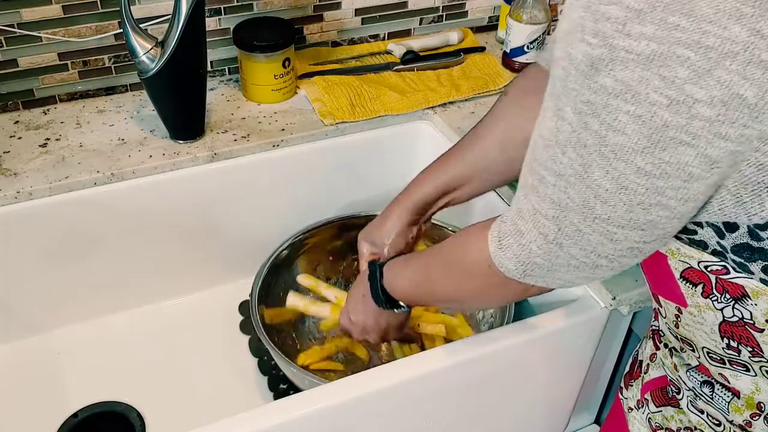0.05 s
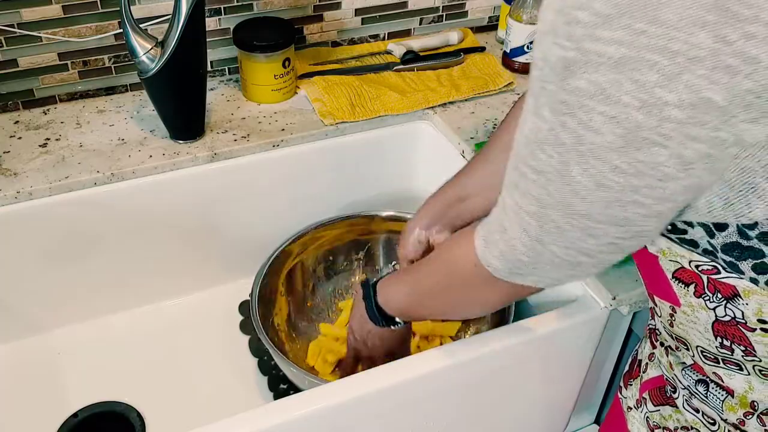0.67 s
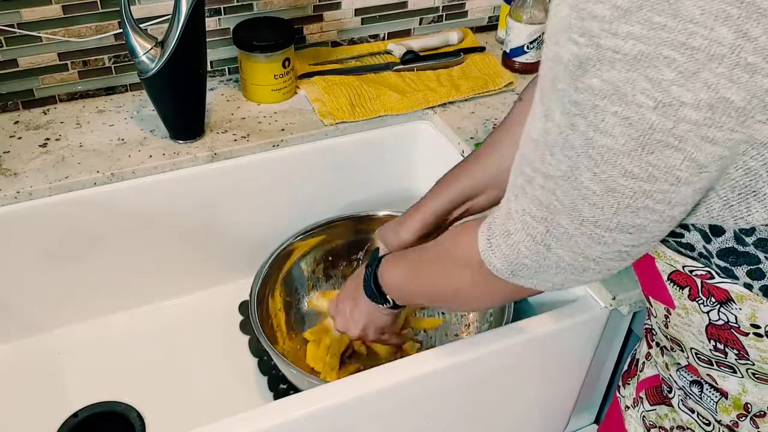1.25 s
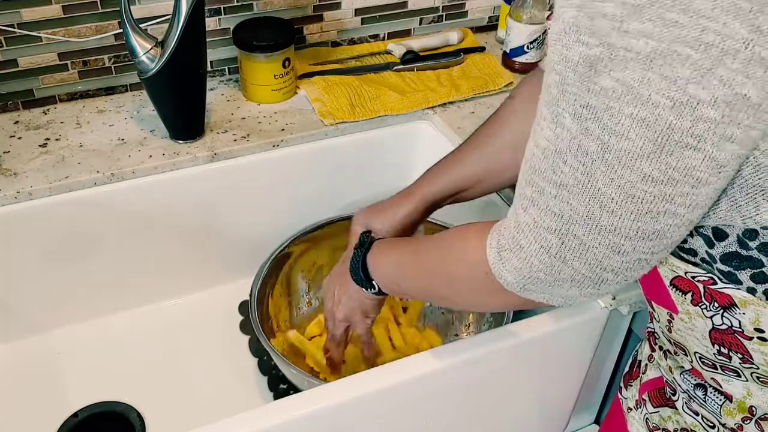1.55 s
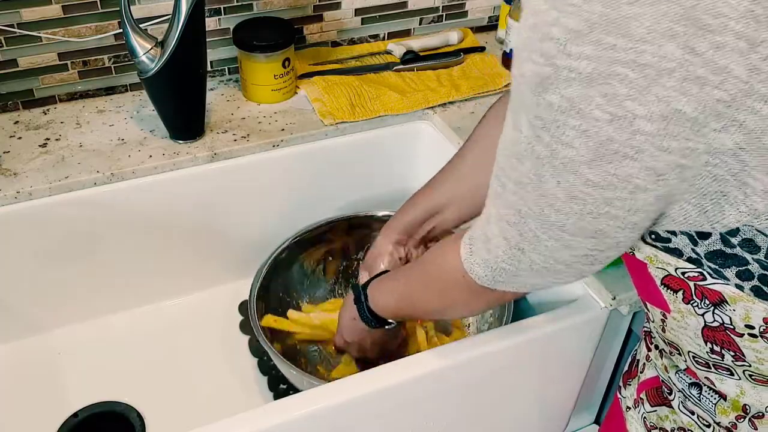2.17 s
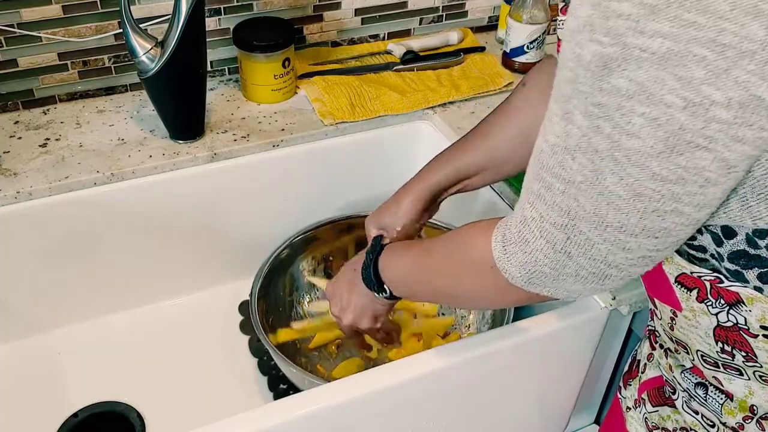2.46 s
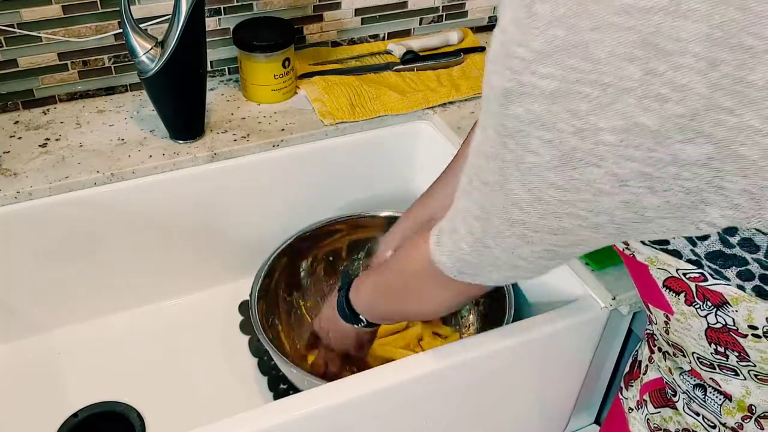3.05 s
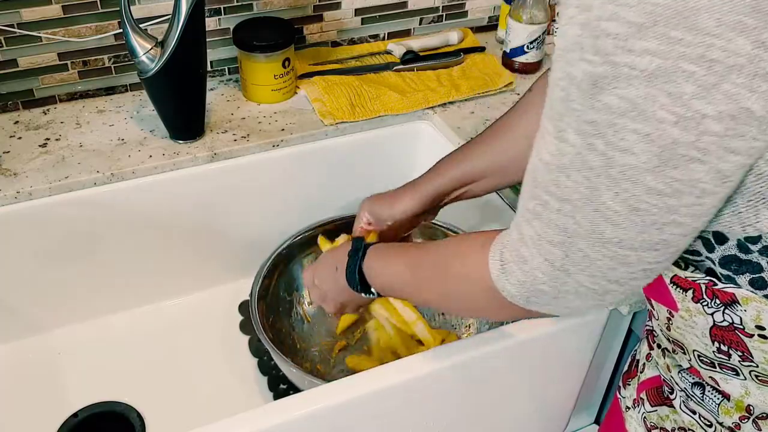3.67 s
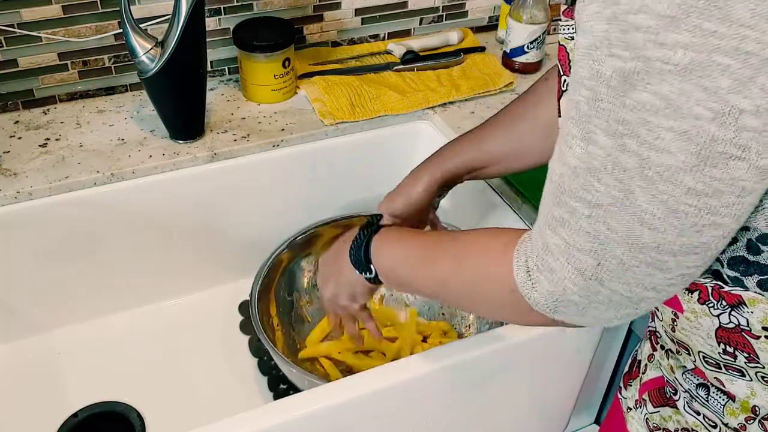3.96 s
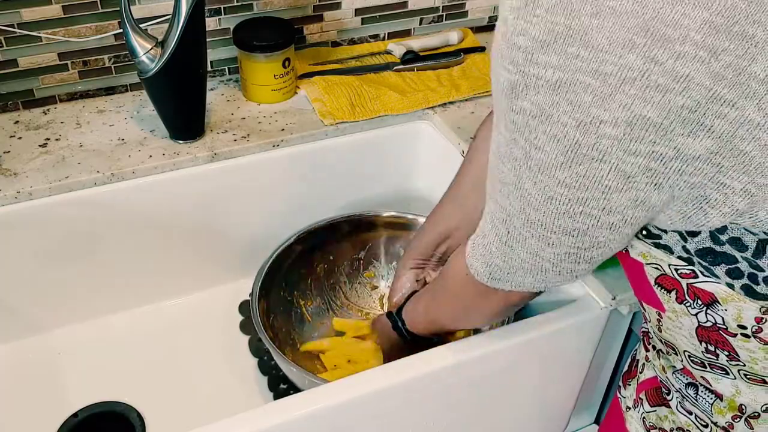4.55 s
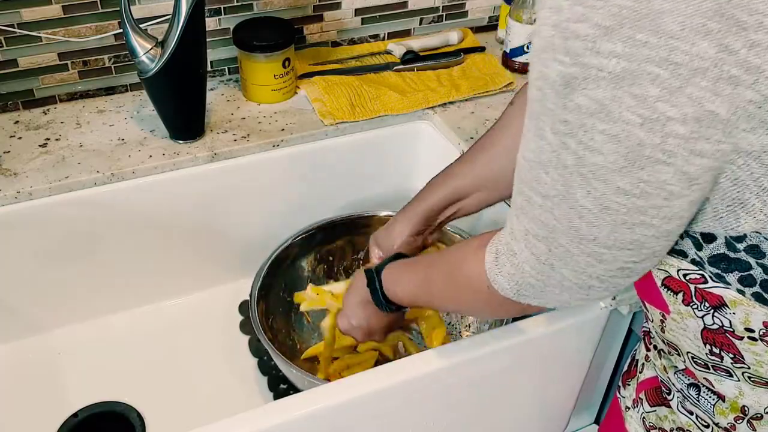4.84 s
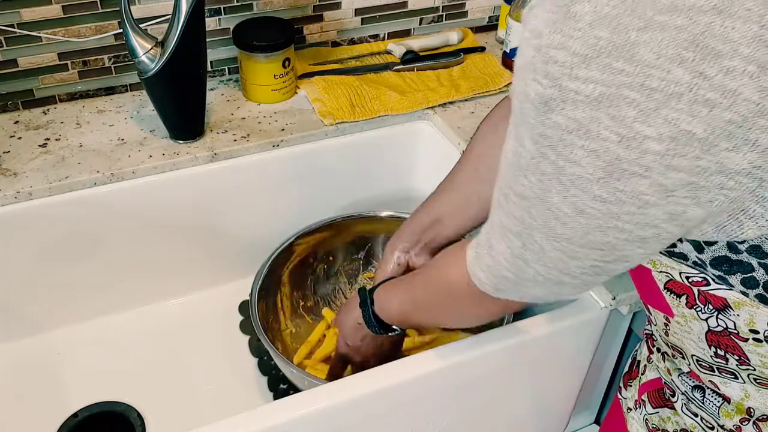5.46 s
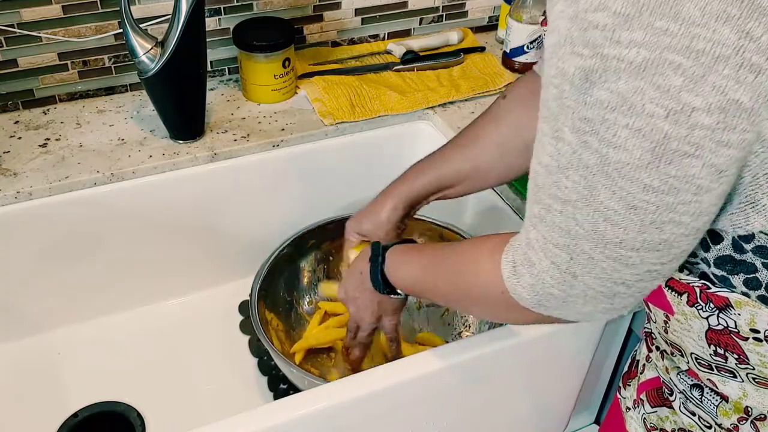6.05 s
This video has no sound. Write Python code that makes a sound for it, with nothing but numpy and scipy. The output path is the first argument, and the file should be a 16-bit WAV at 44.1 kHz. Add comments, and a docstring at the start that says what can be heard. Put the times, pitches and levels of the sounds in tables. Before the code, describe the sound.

Greasy cut potatoes squish and crackle under mixing hands, knocking and rubbing against a metal bowl in a kitchen sink.

```python
"""In a kitchen sink, hands toss raw, buttered potato sticks in a steel bowl.
Falling fries knock the bowl and make it ring; dragged ones rub a hollow note out of it.
The hands dig in, squeeze and let go, so the greasy film smacks, crackles and hisses.
Now and then the bowl bumps the sink or rocks on its base.
Bowl, sink and kitchen echo it all over a faint room hum."""
import sys
import numpy as np
from scipy import signal
from scipy.fft import rfft, irfft
from scipy.io import wavfile
from scipy.ndimage import uniform_filter1d

SR = 44100
rng = np.random.default_rng(int(sys.argv[2]) if len(sys.argv) > 2 else 0)


def master_out(mix):
    """Clip the mix to full scale and print it as 16-bit PCM to the path in sys.argv[1]."""
    frames = np.transpose(np.atleast_2d(mix))
    ceiling = np.clip(frames, -1, 1)
    pcm = np.round(ceiling * 32767).astype(np.int16)
    wavfile.write(sys.argv[1], SR, pcm)


N = 278271  # table levels are relative: each function adds its own gain

# fries and knuckles landing in the bowl: t/s, ring level/dB, slap level/dB, knock f/Hz
LANDINGS = [(0.118, -30, -74, 704), (0.283, -39, -53.5, 795), (0.418, -26.5, -44, 416),
            (0.449, -12.5, -28, 760), (0.465, -15, -37, 620), (0.499, -46, -36.5, 670),
            (0.513, -20, -35.5, 378), (0.58, -28, -43.5, 856), (0.659, -25.5, -34.5, 773),
            (1.236, -34.5, -42.5, 942), (1.479, -37, -56, 700), (1.545, -23.5, -39.5, 910),
            (1.6025, -37, -32, 790), (1.6075, -18.5, -23.5, 924), (1.62, -26, -29.5, 776),
            (1.956, -35.5, -41, 954), (2.307, -33.5, -50, 758), (2.457, -25, -36.5, 980),
            (2.611, -29.5, -40.5, 1120), (2.6765, -21, -29.5, 695), (2.685, -20, -54, 700),
            (2.708, -23.5, -31.5, 792), (2.886, -55, -54, 790), (2.972, -35.5, -37.5, 786),
            (3.004, -39.5, -37, 447), (3.706, -41.5, -58, 687), (3.755, -60, -41.5, 1100),
            (3.78, -67.5, -41, 1060), (3.805, -67, -44, 1080), (3.883, -25, -38.5, 660),
            (3.899, -28, -41, 620), (3.955, -29.5, -38, 820), (4.051, -37.5, -42, 890),
            (4.141, -62, -43.5, 887), (4.258, -55, -55.5, 786), (4.533, -41.5, -38, 826),
            (5.077, -15, -36, 837), (5.396, -50, -37.5, 444), (6.022, -67, -56.5, 1060),
            (6.107, -39, -29, 800), (6.119, -24.5, -33.5, 660), (6.171, -20, -32, 770),
            (6.181, -27, -48, 706), (6.212, -21, -38, 600)]


def knocks():
    """Each landing gives a short pitched knock, a slap and a soft thud, and makes the bowl ring."""
    out, t = np.zeros(N), np.arange(SR // 3) / SR
    for s, ring_db, slap_db, hz in LANDINGS:
        softness_db = max(-35.5 - slap_db, 0)  # soft landings lose their knock
        knock = amp(slap_db + 5 - 1.8 * softness_db) * blip(t, hz, peak_s=0.0022)
        slap = amp(slap_db + 19.5) * colour(patter(t, follow=0.57, fade_s=0.014), SLAP_SPECTRUM)
        ring = amp(ring_db - 16.5) * bowl_ring(t)
        ring += amp(slap_db + 3) * bowl_ring(t, above_hz=600)  # a slap also rings the higher tones
        add(out, s, knock + (ring + slap + thud(t, ring_db - 24)) * landing(t, slap_db))
    return out


def landing(t, slap_db):
    """Loudness of a landing: gentle ones swell slowly, and the settling heap muffles them all."""
    rise_s = 0.00084 * amp(-.85 * max(slap_db + 22, -24))
    free_s, damping_db_per_s = 0.0488, 211
    return (1 - np.exp(-t / rise_s)) * amp(-damping_db_per_s * np.maximum(t - free_s, 0))


# the loaded bowl's weaker tones: f/Hz, level/dB, time to fade by 60 dB/s
BOWL_TONES = [(242, -28, 0.24), (305, -17.5, 0.32), (372, -22.5, 0.1), (411, -21.5, 0.071),
              (470, -15.5, 0.22), (561, -15.5, 0.4), (618, -14, 0.073), (733, -23, 0.12), (814, -23.5, 0.3),
              (863, -25, 0.27), (921, -20, 0.14), (1035, -30.5, 0.19), (1075, -29.5, 0.3),
              (1170, -31.5, 0.14), (1750, -33.5, 0.19), (1920, -39.5, 0.13)]


def bowl_ring(t, above_hz=0):
    """The steel rings: the spot that is hit sets each tone's strength, and the load shifts its pitch."""
    detune, spot = rng.standard_normal((2, len(BOWL_TONES)))
    tuning = 1 + 0.0018 * detune + 0.0074 * rng.standard_normal()
    return sum(amp(db + spot_db - 60 * t / fade_s) * np.sin(2 * np.pi * hz * shift * t)
               for (hz, db, fade_s), shift, spot_db in zip(BOWL_TONES, tuning, 4 * spot)
               if hz > above_hz)


def hollow_note():
    """Drags and knocks feed the bowl's main tone, which rings on after them."""
    note_hz, fade_s = 490, 0.15  # fades by 60 dB in this time
    energy, t = np.zeros(N), np.arange(SR // 3) / SR
    for s, length, db, _ in DRAGS:
        add(energy, s, (amp(db - 0.95) * drag(np.arange(0, length, 1 / SR), length)) ** 2)
    keep = amp(-120 / (fade_s * SR))  # share of the energy left after one sample
    energy = signal.lfilter([1 - keep], [1, -keep], energy)
    for s, ring_db, slap_db, _ in LANDINGS:
        add(energy, s, (amp(ring_db - 4 - 60 * t / fade_s) * landing(t, slap_db)) ** 2)
    hz = note_hz + 6.005 * wander(N, size=1500)  # the load shifts
    waver_db = 2.5 * wander(N, size=500)
    chatter_db = 1.5 * wander(N, size=90)  # fries chatter against the steel
    return np.sqrt(energy) * amp(waver_db + chatter_db) * np.sin(2 * np.pi * np.cumsum(hz) / SR)


# the heap dragged along the steel: t/s, length/s, hollow note level/dB, scuff level/dB
DRAGS = [(0.121, 0.075, -44.5, -74), (0.507, 0.11, -37, -51.5), (0.612, 0.079, -43.5, -56),
         (1.25, 0.052, -45.5, -54), (1.291, 0.099, -70, -64.5), (1.492, 0.098, -35, -54.5),
         (1.634, 0.075, -37, -48), (2.15, 0.073, -69, -61), (2.287, 0.075, -51, -70.5),
         (2.459, 0.055, -36, -49), (2.59, 0.19, -38, -52.5), (3.25, 0.109, -68.5, -64.5),
         (3.722, 0.27, -55, -60), (3.876, 0.152, -42, -46), (4.579, 0.088, -61.5, -62),
         (4.988, 0.045, -42.5, -72), (5.029, 0.14, -42, -49), (5.084, .055, -36, -53),
         (5.159, 0.143, -60.5, -60), (5.278, 0.09, -47.5, -60.5), (5.335, 0.122, -48, -55.5),
         (5.537, 0.11, -44, -58), (5.627, 0.064, -38.5, -53), (6.177, 0.0685, -35.5, -50),
         (6.26, 0.043, -50, -66)]
# the sound of potato hitting or scuffing steel: f/Hz, level/dB
SLAP_SPECTRUM = [(150, -41), (400, -12), (620, -7), (800, 6), (950, -5), (1100, -7.5), (1350, -17),
                 (2100, -19.5), (3500, -34), (7000, -66.5)]


def rubs():
    """Potato sticks and slips on the steel, stirring its weaker tones while the heap shuffles."""
    out = np.zeros(N)
    for s, length, _, scuff_db in DRAGS:
        t = np.arange(0, length, 1 / SR)
        ring = bowl_ring(np.arange(SR // 4) / SR)
        slips = pops(len(t) + len(ring), per_s=900, spread_db=1)
        stir = amp(-1.5) * evened(signal.fftconvolve(slips, ring, "valid")[:len(t)])
        scuff = amp(-9.5) * evened(colour(slips, SLAP_SPECTRUM)[-len(t):])
        shuffle = amp(-14.5) * evened(colour(slips, THUD_SPECTRUM)[-len(t):])
        add(out, s, amp(scuff_db) * (stir + scuff + shuffle) * drag(t, length))
    return out


def drag(t, length):
    """Loudness of a drag: it starts softly and eases off."""
    return amp(-4.5 * t / length) * signal.windows.tukey(len(t), .35)


# the dull sound of the potato heap: f/Hz, level/dB
THUD_SPECTRUM = [(60, -18), (140, -19.5), (220, -13.5), (320, 4), (430, 4), (600, -14), (900, -21.5),
                 (2000, -60), (5000, -95)]


def thud(t, db):
    """A dull blow travels through the heap."""
    return amp(db + 26) * colour(patter(t, follow=0.6, fade_s=0.031), THUD_SPECTRUM)


def patter(t, follow, fade_s):
    """One firm contact, then the rest of the handful settling."""
    push = follow * rng.standard_normal(len(t)) * np.exp(-t / fade_s) / np.sqrt(fade_s * SR / 2)
    push[0] += 1
    return push


# wet surfaces meeting or pulling apart:
# t/s, hiss level/dB, squelch level/dB, air pocket f/Hz, gap to the steel f/Hz, burst length/s
WET_SMACKS = [(0.127, -51, -78, 8000, 5060, 0.0044), (0.222, -43, -72, 7100, 6000, .004),
              (0.287, -63, -68, 7500, 4800, .009), (0.461, -38, -52, 6800, 4920, 0.0074),
              (0.578, -43, -59.5, 7000, 4800, 0.0055), (0.66, -30.5, -54.5, 7450, 4840, 0.0068),
              (0.793, -34, -81, 7200, 4400, .012), (0.976, -39.5, -51, 6600, 3850, 0.0058),
              (1.114, -54, -81, 8582, 5980, .005), (1.236, -57, -68, 7500, 5060, 0.015),
              (1.337, -53, -71, 9500, 6500, 0.0055), (1.546, -22, -41, 6270, 4720, .005),
              (1.604, -34.5, -44, 6900, 5000, 0.0063), (1.809, -36.5, -72, 7160, 5100, 0.0065),
              (1.831, -31, -70, 7000, 4670, .008), (1.846, -24.5, -71, 7000, 4550, 0.013),
              (2.025, -36, -46.5, 7200, 4400, .005), (2.197, -44.5, -69.5, 7020, 6020, .005),
              (2.343, -46.5, -72.5, 7800, 7000, .004), (2.456, -32, -48, 9000, 6060, 0.0058),
              (2.467, -34.5, -52, 11000, 7430, 0.0066), (2.611, -53, -59, 6500, 4800, 0.0045),
              (2.707, -31.5, -47.5, 6950, 5300, 0.0038), (2.897, -49.5, -69, 7200, 4800, 0.0034),
              (2.93, -33.5, -64, 7040, 4770, .006), (2.969, -20.5, -57, 6860, 4640, 0.0048),
              (3.082, -27.5, -54, 6860, 4500, 0.007), (3.15, -30, -50.5, 7000, 4200, .007),
              (3.207, -41, -43, 6800, 2860, 0.0056), (3.355, -52, -72, 8500, 4690, 0.015),
              (3.587, -57, -82, 9500, 6980, .004), (3.876, -47, -54.5, 7000, 4300, 0.0094),
              (3.9683, -12, -37.5, 6900, 4110, 0.0054), (4.052, -45, -53, 8500, 2820, 0.0038),
              (4.091, -21.5, -73, 6550, 4000, 0.0019), (4.116, -34, -71, 6900, 3830, .003),
              (4.2345, -42.5, -70, 5230, 4560, .004), (4.53, -23.5, -38, 6860, 4380, 0.0081),
              (5.078, -33, -46.5, 4760, 4710, 0.013), (5.36, -45, -56.5, 6800, 3400, 0.0085),
              (5.395, -34, -58, 7450, 5000, 0.0066), (5.517, -25.5, -62, 6900, 4470, 0.0089),
              (5.614, -33.5, -41, 6500, 3870, 0.0085), (5.656, -33, -43.5, 6500, 4000, 0.0072),
              (5.727, -47, -60, 7050, 4202, .01), (6.107, -24.5, -52.5, 6840, 4600, 0.0067),
              (6.285, -47, -76, 7000, 4420, 0.009)]


def smacks():
    """Loud smacks under the hands, and faint stray ones at random as fries come unstuck."""
    out, strays_per_s = np.zeros(N), 3
    chance = rng.random((round(strays_per_s * N / SR), 3))
    strays = [(when * N / SR, -64.5 + 9 * size, -78, 6000 + 4000 * pitch, 5500, .002)
              for when, size, pitch in chance]  # same columns as the table
    for s, *row in WET_SMACKS + strays:
        lead_s, sound = smack(*row)
        add(out, s - lead_s, sound)
    return out


def smack(hiss_db, squelch_db, pocket_hz, gap_hz, burst_s):
    """A rustle, then a burst that rings trapped air. Returns the time to the burst, and the sound."""
    t = np.arange(-SR // 25, SR // 6) / SR
    after = np.maximum(t, 0)
    touch = 0.18 * np.exp(-abs(t) / (2.1 * burst_s))
    rise = 1 - np.exp(-after / 0.00087)
    fall = 0.89 * np.exp(-after / burst_s) + 0.26 * amp(-60 * after / 0.11)
    burst = pops(len(t), per_s=6500, spread_db=1.5) * (touch + rise * fall)
    pocket = resonate(amp(5.5) * resonate(burst, pocket_hz, width_hz=1400), pocket_hz, width_hz=3600)
    gap = resonate(amp(8) * resonate(burst, gap_hz, width_hz=550), gap_hz, width_hz=1200)
    hiss = colour(burst, CRACKLE_SPECTRUM) + pocket + gap
    squelch = colour(burst, SQUELCH_SPECTRUM)
    return -t[0], amp(hiss_db - 8) * hiss + amp(squelch_db + 6.5) * squelch


# the fine, bright crackle of butter: f/Hz, level/dB
CRACKLE_SPECTRUM = [(1000, -49.5), (3000, -28.5), (3700, -21), (4400, -12), (5500, -8), (6400, -1),
                    (7200, 2.5), (7900, -3.5), (8600, -12), (10000, -22.5), (11500, -25.5), (12400, -44.5),
                    (15500, -60)]
# the lower squelch of larger air pockets: f/Hz, level/dB
SQUELCH_SPECTRUM = [(100, -11), (250, 4), (500, 7), (780, -0.5), (1120, 6.5), (1500, 2), (1950, 5),
                    (2600, 4), (3800, 6), (5500, 8.5), (8000, -2), (11000, -10), (12500, -16.5),
                    (15500, -48)]
# hands grabbing fries: start t/s, dig-in length/s, t/s when the swelling squelch would reach full level
# (may lie outside the grab), let-go t/s, crackle level/dB, squelch level/dB
HANDFULS = [(0.451, 0.032, 0.44, 0.54, -52.5, -66), (0.655, 0.05, 0.91, 0.86, -49.5, -51.5),
            (0.86, 0.012, 0.86, 0.94, -49.5, -52), (1.765, 0.062, 1.94, 2.062, -41, -48),
            (2.13, 0.02, 1.7, 2.26, -64.5, -73.5), (2.93, 0.036, 3.42, 3.223, -45.5, -35),
            (3.11, 0.042, 3.14, 3.164, -43, -44.5), (3.22, 0.016, 3, 3.275, -54, -58.5),
            (3.868, 0.012, 3.97, 3.993, -54, -46), (4.236, 0.087, 4.56, 4.553, -46.5, -43),
            (4.32, 0.024, 4.35, 4.38, -56, -56.5), (5.31, 0.092, 5.59, 5.44, -49, -55),
            (5.603, 0.006, 5.75, 5.672, -41.5, -43), (6.1, 0.033, 6.1, 6.16, -57.5, -70)]


def squeezes():
    """Sliding fries crackle; closing hands burst larger pockets, which squelch. Letting go ends both."""
    out = np.zeros(N)
    dig_from_db, swell_db_per_s, release_db_per_s = -17, 107, 310
    for start, dig_s, full_at, let_go, crackle_db, squelch_db in HANDFULS:
        t = np.arange(start, let_go + .2, 1 / SR)
        dig_db = dig_from_db * np.maximum(1 - (t - start) / dig_s, 0)
        contact = amp(dig_db - release_db_per_s * np.maximum(t - let_go, 0))
        swell_db = -swell_db_per_s * np.maximum(full_at - t, 0)
        jitter = rng.standard_normal((2, len(t)))  # the grip catches and slips many times a second
        grip, squeeze = evened(uniform_filter1d(uniform_filter1d(jitter, size=500), size=300))
        slide = contact * amp(crackle_db + 2 * grip)
        press = contact * amp(squelch_db + swell_db + 2.8 * squeeze)
        crackle = amp(1) * colour(slide * pops(len(t), per_s=800, spread_db=2.5), CRACKLE_SPECTRUM)
        squelch = colour(press * pops(len(t), per_s=420, spread_db=2), SQUELCH_SPECTRUM)
        froth = amp(-13.5) * bubbles(slide, per_s=230, cycles=22, low_hz=5380, high_hz=9900)
        froth += amp(-14.5) * bubbles(press, per_s=240, cycles=5, low_hz=663.6, high_hz=3040)
        spit = amp(-15) * bubbles(press, per_s=125, cycles=5, low_hz=8000, high_hz=11740)
        add(out, start, crackle + squelch + froth + spit)
    return out


def bubbles(push, per_s, cycles, low_hz, high_hz, count=10):
    """Air bubbles in the butter burst as loudly as they are pushed; each pings at a rising pitch."""
    out = np.zeros(len(push))
    for hz in np.geomspace(low_hz, high_hz, count) * rng.uniform(1.0, 1.04, count):
        age = np.arange(int(4 * cycles * SR / hz)) * hz / SR / cycles
        tone = np.sin(2 * np.pi * cycles * (age + 0.016 * age ** 2))
        ping = tone * np.exp(-age) * (1 - np.exp(-12 * age))
        sizes = amp(1.9 * np.minimum(rng.exponential(1, len(push)), 3))
        bursts = sizes * (rng.random(len(push)) < per_s / count / SR)
        out += signal.oaconvolve(push * bursts, ping / np.linalg.norm(ping))[:len(push)]
    return out * np.sqrt(SR / per_s / 2)


# fingers and fries sliding down the greasy wall: t/s, length/s, low edge of the hiss f/Hz, level/dB
WALL_SLIDES = [(0.656, 0.05, 4750, -45), (0.776, 0.13, 4100, -49.5), (1.829, 0.11, 4110, -40.5),
               (2.962, 0.1, 4500, -43), (3.086, 0.13, 4030, -49.5), (4.08, 0.057, 3990, -46),
               (4.231, 0.1, 4584, -43.5), (4.325, 0.12, 3940, -44.5), (5.068, 0.078, 4740, -44.5),
               (5.501, 0.12, 4470, -45.5), (6.108, 0.079, 4430, -44.5), (6.207, 0.042, 4400, -45)]


def scrapes():
    """A wet hiss rings the gap under a finger; it sinks and fades as the finger slows."""
    out, sag_hz_per_s, fade_db = np.zeros(N), 1200, -10
    for s, length, edge_hz, db in WALL_SLIDES:
        t = np.arange(0, length, 1 / SR)
        slips = pops(len(t), per_s=900, spread_db=2.5)
        hiss = signal.sosfilt(signal.butter(6, [edge_hz, 7800], "band", fs=SR, output="sos"), slips)
        gap = resonate(hiss, 1.003 * edge_hz - sag_hz_per_s * t, width_hz=610)
        catch_db = 3 * wander(len(t), size=300)  # the finger catches and slips
        loudness = amp(db + fade_db * t / length + catch_db) * signal.windows.tukey(len(t), .12)
        add(out, s, loudness * evened(hiss + amp(3) * gap))
    return out


# the bowl shoved against the sink: t/s, boom level/dB, wall level/dB, thud level/dB, thud f/Hz
SINK_BUMPS = [(0.287, -64.5, -56.5, -44, 379), (0.464, -56.5, -40, -35, 320), (0.657, -64.5, -45, -39, 420),
              (1.55, -60, -45.5, -34, 295), (1.611, -59, -42.5, -56, 395), (1.942, -63, -75, -62, 323),
              (2.46, -75, -52.5, -39, 285), (2.613, -65, -65, -40, 301), (2.707, -57.5, -60, -32, 298),
              (2.964, -67, -47, -42, 401), (3.001, -75, -55, -40.5, 350), (3.13, -57.5, -53.5, -49.5, 299),
              (3.709, -80.5, -71, -45.5, 348), (3.955, -58.5, -42.5, -35.5, 350),
              (4.086, -64, -44, -39, 345), (4.359, -63, -57.5, -55, 306), (4.559, -67, -68, -62, 296),
              (5.081, -60.5, -66, -38, 345), (5.269, -60.5, -58.5, -56, 303), (5.36, -60, -50, -48, 372),
              (5.389, -51, -45.5, -36.5, 401), (5.51, -65.5, -58, -51.5, 320),
              (6.094, -63, -68.5, -35.5, 446), (6.206, -56, -53, -32.5, 313)]


def bumps():
    """A shove thuds through the heap; the sink gives a deep boom and its wall rings faintly."""
    out, t = np.zeros(N), np.arange(SR // 2) / SR
    boom = dying_tone(t, hz=80, fade_s=0.075) - 0.69 * dying_tone(t, hz=60, fade_s=0.054)
    wall = dying_tone(t, hz=219, fade_s=0.046) + 0.5 * dying_tone(t, hz=172, fade_s=0.039)
    cushion = 1 - np.exp(-t / 0.0045)
    for s, boom_db, wall_db, thud_db, hz in SINK_BUMPS:
        heap = amp(thud_db - 6) * blip(t, hz, peak_s=0.0099) + thud(t, thud_db - 3.5) * cushion
        add(out, s, amp(boom_db + 5.5) * boom + amp(wall_db - 1) * wall * cushion + heap)
    return out


# the bowl rocking back onto its base: t/s, level/dB
BOWL_ROCKS = [(2.305, -44.5), (3.035, -53.5), (3.71, -45), (4.09, -48)]


def rocks():
    """Set down on its base, the bowl hums one low, lingering tone."""
    out, t = np.zeros(N), np.arange(SR // 2) / SR
    hz, rise_s, fade_s = 344, 0.0095, 0.39
    for s, db in BOWL_ROCKS:
        add(out, s, amp(db - 60 * t / fade_s) * (1 - np.exp(-t / rise_s)) * np.sin(2 * np.pi * hz * t))
    return out


# tones of the thin steel wall: f/Hz, width/Hz, level/dB
WALL_TONES = [(780, 26, 10), (921, 32, 8.5), (1084, 32, 6.5), (1940, 31, 8.5), (2674, 24, -4.5),
              (3960, 67, -2.5), (4500, 43, -1), (5016, 120, -0.5), (6100, 150, -3), (6570, 50, -6.5),
              (7000, 53, -5), (7530, 98.7, -1), (7963, 46, -4)]


def steel(wet):
    """The thin wall under the fries rings along with the crackle."""
    return amp(-3) * sum(amp(db) * signal.lfilter(*signal.iirpeak(hz, hz / width, fs=SR), wet)
                         for hz, width, db in WALL_TONES)


# the sound of the butter film left alone: f/Hz, level/dB
FIZZ_SPECTRUM = [(1000, -30), (3500, -19.5), (5200, -10), (6400, 0), (7600, 0), (9000, -5.5),
                 (11500, -15.5), (13000, -30)]
# how loudly it fizzes over time: t/s, level/dB
FIZZ_LEVELS = [(0, -69.5), (0.3, -67), (1.1, -70.5), (2.1, -67), (2.5, -64), (2.85, -70), (3.6, -72.5),
               (4.7, -70.5), (5.9, -69), (6.3, -65.5)]


def fizz():
    """The butter coating keeps ticking faintly, in little clumps."""
    level_db = np.interp(np.arange(N) / SR, *np.transpose(FIZZ_LEVELS)) + 1.9 * wander(N, size=900)
    return colour(amp(level_db) * pops(N, per_s=60, spread_db=3.5), FIZZ_SPECTRUM)


def wet_side():
    """All the wet sounds from one side of the heap, with the steel under them."""
    top_hz = 12700  # the wet sounds' highest treble is rolled off
    wet = smacks() + squeezes() + scrapes() + fizz()
    return signal.sosfilt(signal.butter(5, top_hz, fs=SR, output="sos"), wet + steel(wet))


def bowl_echoes(x):
    """Quick echoes off bowl and sink; the moving hands keep fading one pattern into the next."""
    hop = round(0.16 * SR)
    x, out = np.pad(x, (hop, 2 * hop)), np.zeros((2, N + hop))
    for at in range(0, N + hop, hop):
        piece = x[at:at + 2 * hop] * signal.windows.cosine(2 * hop)
        pair = echoes(piece, life=0.18, delay_s=.0003, low_hz=610, size=4096)
        for channel, sound in zip(out, pair):
            add(channel, at / SR, sound)
    return out[:, hop:]


# how long echoes last, before scaling by life: f/Hz, time to fade by 60 dB/s
ECHO_TIMES = [(150, 0.083), (500, 0.28), (1400, 0.17), (4000, 0.23), (10000, 0.16)]


def echoes(x, life, delay_s, low_hz, size=22050):
    """Many reflections blur into a tail in which each pitch dies at its own rate."""
    hz, t, bands = signal.stft(rng.standard_normal((2, size)), SR, nperseg=256)
    fade = amp(-60 * t / (life * read(ECHO_TIMES, hz))[:, None])
    tail = signal.istft(bands * fade, SR, nperseg=256)[1]
    bass_cut = signal.butter(2, low_hz, "high", fs=SR, output="sos")
    tail = signal.sosfilt(bass_cut, tail / np.linalg.norm(tail[0]))
    tail = np.pad(spread(*tail), ((0, 0), (round(delay_s * SR), 0)))
    return signal.fftconvolve(x[None], tail, axes=1)[:, :N]


# the kitchen's background noise: f/Hz, level/dB
HUM_SPECTRUM = [(20, -19), (50, -12), (85, -6.5), (125, -9.5), (180, -11), (220, -5.5), (280, -11),
                (400, -14), (490, -11.5), (620, -23), (1300, -31.5), (2000, -25.5), (3000, -27),
                (6800, -23), (10000, -27.5), (13000, -35), (15500, -37.5)]


def hum():
    """Steady room noise, nearly the same on both sides in the bass."""
    mid, side = (colour(rng.standard_normal(N), HUM_SPECTRUM, size=8192) for _ in range(2))
    return amp(-70) * spread(mid, side)


# how wide the room sounds: f/Hz, side-to-mid ratio
ROOM_WIDTH = [(100, .2), (380, .22), (520, .7), (800, .9), (1400, 1.0), (4000, 1.0), (12000, 1.0)]


def spread(mid, side):
    """Left and right from a shared part (mid) and a differing part (side), which is weak in the bass."""
    width = read(ROOM_WIDTH, np.fft.rfftfreq(len(side), 1 / SR))
    side = irfft(rfft(side) * width, len(side))
    return np.array([mid + side, mid - side])


def amp(db):
    """Turns decibels into a gain."""
    return 10 ** (np.asarray(db) / 20)


def evened(x):
    """Scales a signal to an average strength (rms) of 1."""
    return x / np.sqrt(np.mean(x ** 2) + 1e-20)


def read(points, hz):
    """Looks up a table between its rows, on a log-frequency scale."""
    f, value = np.transpose(points)
    return np.interp(np.log(hz + 1), np.log(f + 1), value)


def add(mix, s, sound):
    """Mixes a sound in at s seconds."""
    part = mix[max(round(s * SR), 0):][:len(sound)]
    part += sound[:len(part)]


def colour(x, points, size=2048):
    """Gives a sound the tone colour of a spectrum table; only the table's shape counts."""
    hz = abs(np.fft.fftfreq(size, 1 / SR))
    log_gain = np.log(amp(read(points, hz)))
    taps = np.fft.ifft(np.exp(np.conj(signal.hilbert(log_gain)))).real  # rings only after a click
    return signal.fftconvolve(x, taps / np.linalg.norm(taps))[:len(x)]


def resonate(x, hz, width_hz):
    """Lets a sound ring around one pitch, which may glide."""
    turn = np.exp(2j * np.pi * np.cumsum(hz * np.ones(len(x))) / SR)
    keep = np.exp(-np.pi * width_hz / SR)
    return 2 * (turn * signal.lfilter([1 - keep], [1, -keep], x / turn + 1e-18)).real


def pops(length, per_s, spread_db):
    """Tiny films and threads of butter snap: random clicks, a few of them large."""
    size = amp(spread_db * np.minimum(rng.exponential(1, length), 4))
    return evened(size * rng.choice([-1, 1], length) * (rng.random(length) < per_s / SR))


def wander(length, size):
    """A smooth random drift; a larger size makes it slower."""
    return evened(uniform_filter1d(uniform_filter1d(rng.standard_normal(length), size), size))


def blip(t, hz, peak_s):
    """A tone that swells to its peak and dies at once."""
    return t / peak_s * np.exp(1 - t / peak_s) * np.sin(2 * np.pi * hz * t)


def dying_tone(t, hz, fade_s):
    """A struck tone that fades away."""
    return np.sin(2 * np.pi * hz * t) * np.exp(-t / fade_s)


def later(x, delay_s):
    """Delays a sound slightly."""
    t = np.arange(N) / SR
    return np.interp(t - delay_s, t, x)


def scene():
    """The bowl and both sides of the wet heap, with near and far echoes, sink bumps and room hum."""
    note, clatter = hollow_note(), knocks() + rubs()
    left, right = wet_side(), wet_side()
    bowl = note + clatter + rocks()
    near = bowl_echoes(amp(-7.5) * left + amp(-6.5) * clatter) + bowl_echoes(amp(-8.5) * right)
    into_room = amp(-14) * (left + right) + amp(-12.5) * clatter + amp(-24) * note
    far = echoes(into_room, life=0.83, delay_s=.006, low_hz=148.7)
    direct = np.array([bowl, later(bowl, .00009)])  # the bowl is heard on the left first
    cross_s = .00003  # extra travel time to the far side
    wet = np.array([left + later(right, cross_s), right + later(left, cross_s)])
    return direct + amp(-10) * wet + near + far + bumps() + hum()


# how the two microphones differ: f/Hz, left minus right level/dB
SIDE_BALANCE = [(60, 1), (99, 3.5), (160, 1), (270, 3.5), (450, 2), (740, 1), (1220, 1.5), (2010, 2),
                (3330, 2), (4800, 4.5), (6400, 5.5), (7400, -3), (8500, -5.5), (11000, -1.5), (15000, 3.5)]


def record(dry):
    """Each microphone colours the sound its own way, and the highest treble is cut."""
    lean_db = read(SIDE_BALANCE, np.fft.rfftfreq(N, 1 / SR))
    heard = irfft(rfft(dry) * amp(np.array([lean_db, -lean_db]) / 2), N)
    treble_cut = signal.firwin(511, 15500, window=("kaiser", 9), fs=SR)
    return signal.oaconvolve(heard, treble_cut[None], "same")


dry = scene()
out = record(dry)
master_out(out)
```